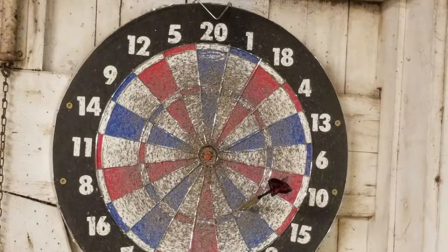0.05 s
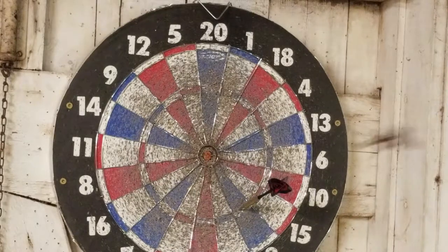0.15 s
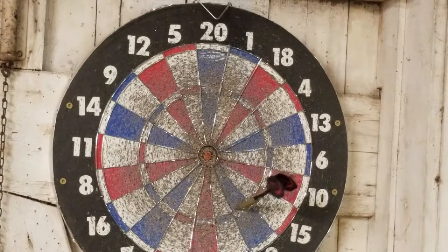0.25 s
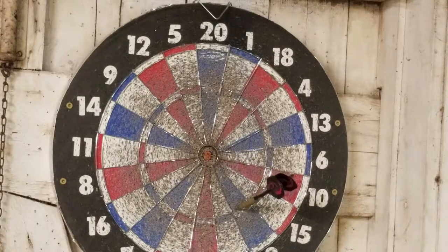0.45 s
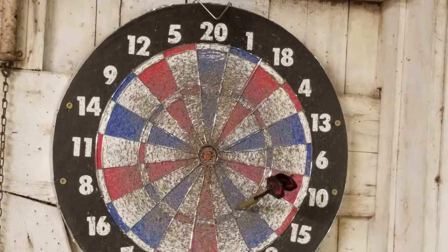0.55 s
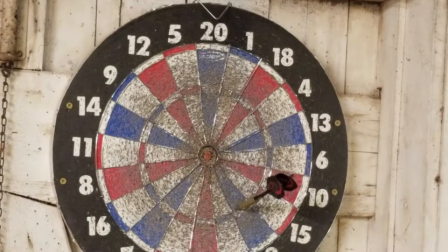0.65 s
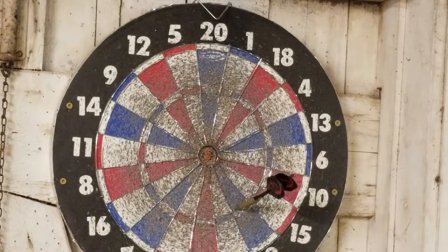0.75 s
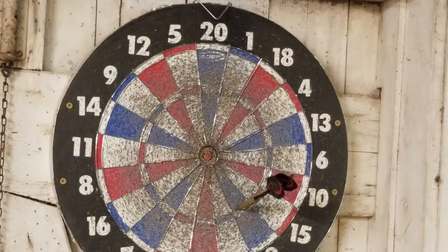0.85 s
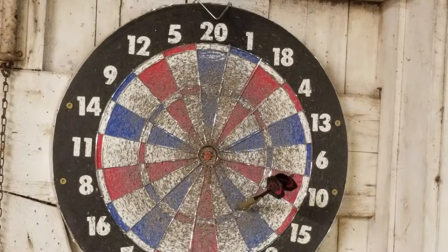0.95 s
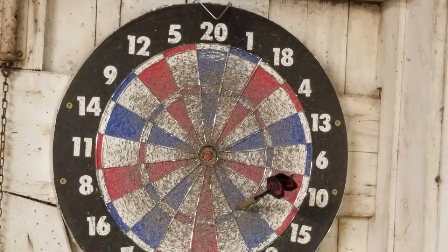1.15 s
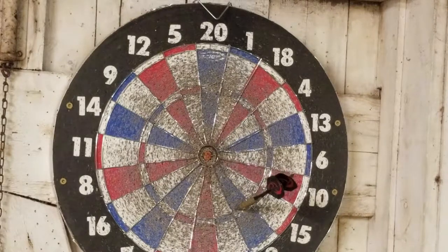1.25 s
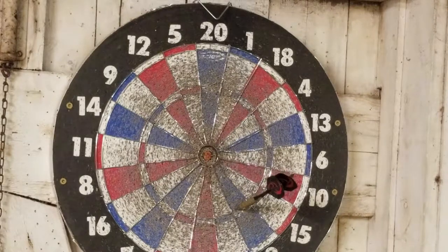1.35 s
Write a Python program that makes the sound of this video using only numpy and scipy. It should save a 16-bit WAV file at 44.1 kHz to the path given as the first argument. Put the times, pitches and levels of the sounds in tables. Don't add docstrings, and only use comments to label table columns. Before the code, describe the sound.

A dart hits a wall-hung board once at about 0.23 seconds: a very short fibrous crunch, a tiny high metallic ring, and a solid woody thump that the planks carry on. The small room's tail fades by roughly 0.6 seconds, with a faint deep shudder beneath. Throughout, a quiet low motor hum slowly throbs over rumble, thin whines and hiss; a barely audible rustle comes near 0.6.

```python
import sys
import numpy as np
from scipy import signal
from scipy.fft import rfft, irfft
from scipy.io import wavfile

SR = 44100
rng = np.random.default_rng(int(sys.argv[2]) if len(sys.argv) > 2 else 0)


def to_linear_factor(level_db):
    exponent = np.asarray(level_db, float) / 20
    return 10 ** exponent


def store_wav(level_fs):
    pcm = np.round(np.clip(np.atleast_2d(level_fs), -1, 1) * 32767)
    wavfile.write(sys.argv[1], SR, pcm.T.astype(np.int16))


N = 61739
T = np.arange(N) / SR
PAN_SPLIT_HZ = 600
LEFT_RIGHT = np.array([[1], [-1]])


def rms_one(x):
    return x / np.sqrt(np.mean(x ** 2) + 1e-20)


def at_hz(points, hz):
    point_hz, value = np.transpose(points)
    return np.interp(np.log(hz), np.log(point_hz), value)


def drift(rate_hz):
    step = 40
    r = np.exp(-2 * np.pi * rate_hz * step / SR)
    noise = rng.standard_normal(N // step + 2002)
    slow = signal.lfilter([1], [1, -2 * r, r * r], noise)[2000:]
    return np.interp(np.arange(N) / step, np.arange(len(slow)), rms_one(slow))


def ring(clicks, hz, t60):
    r = to_linear_factor(-60 / (t60 * SR))
    w = 2 * np.pi * hz / SR
    return signal.lfilter([0, np.sin(w)], [1, -2 * r * np.cos(w), r * r], clicks + 1e-18)


def struck(events, modes, spread_db):
    beam_db = 1
    s, db = np.transpose(events)
    luck = rng.standard_normal((len(s), len(modes)))
    out = np.zeros((2, N))
    for k, (hz, level_db, t60) in enumerate(modes):
        clicks = np.zeros(N)
        clicks[(s * SR).astype(int)] = to_linear_factor(db + level_db + spread_db * luck[:, k])
        pan_db = beam_db * min(hz / PAN_SPLIT_HZ, 1) * (-1) ** k
        out += ring(clicks, hz, t60) * to_linear_factor(pan_db * LEFT_RIGHT)
    return out


def bands(spectrum, alike):
    hz = np.fft.rfftfreq(N, 1 / SR)[1:]
    low_hz, high_hz = spectrum[0][0], spectrum[-1][0]
    likeness = np.clip(at_hz(alike, hz), 0, 1)
    mid, side = rfft(rng.standard_normal((2, N)))[:, 1:]
    stereo = np.sqrt(1 + likeness) * mid + np.sqrt(1 - likeness) * side * LEFT_RIGHT
    full = (hz > low_hz) * (hz < high_hz) * to_linear_factor(at_hz(spectrum, hz)) * stereo
    full = np.pad(full, ((0, 0), (1, 0)))
    full = full / np.std(irfft(full, N))
    place = 3 * np.log2(np.r_[1, hz] / 20)
    out = []
    for k in range(30):
        centre = 20 * 2 ** (k / 3)
        if low_hz / 1.3 < centre < high_hz * 1.3:
            overlap = np.clip(1 - abs(place - k), 0, 1)
            out.append((centre, irfft(full * overlap, N)))
    return out


def bandpass(x, edges_hz):
    return signal.sosfilt(signal.butter(2, edges_hz, "band", fs=SR, output="sos"), x)


def crunch():
    # frequency in Hz, density in dB per Hz.
    fibre_colour = [(410, -25.5), (700, -0.5), (1280, -3), (3100, -25), (3990, -13.5), (4990, -11.5),
                    (6500, -4.5), (8600, -20.5), (13000, -10.5), (16000, -16.5)]
    bite_s, stop_s, t60_s = 0.2215, 0.2298, 0.045
    start_db, stop_db, side_db = -35, -20.5, -7.5
    grains_per_s = 9000

    tears = rng.random((2, N)) < grains_per_s / SR
    strength = to_linear_factor(2.4 * rng.exponential(1, (2, N)))
    grains = tears * strength * rng.choice([-1, 1], (2, N))
    hz = np.fft.rfftfreq(N, 1 / SR) + 1
    mid, side = rms_one(irfft(rfft(grains) * to_linear_factor(at_hz(fibre_colour, hz)), N))
    growing = np.interp(T, [bite_s, stop_s], [start_db, stop_db])
    dying = stop_db - 60 * (T - stop_s) / t60_s
    db = np.where(T < stop_s, growing, dying)
    return (mid + to_linear_factor(side_db) * side * LEFT_RIGHT) * to_linear_factor(db) * (T > bite_s)


def barrel():
    # frequency in Hz, level in dB, t60 in seconds.
    metal_modes = [(3926, 1, 0.067), (4008, -1.5, 0.066), (3520, -15, .12), (5040, -6.5, 0.035),
                   (6660, -2, 0.017), (7400, -12, 0.032), (12670, -7, 0.046)]
    # start in seconds, level in dB.
    jolts = [
        (.2246, -30),
        (.2285, -32),
        (.2328, -28),
    ]
    return struck(jolts, metal_modes, spread_db=1.0)


def board():
    # frequency in Hz, level in dB, t60 in seconds.
    face_modes = [(1178, -2, 0.05), (870, -11, .04), (1390, -7, 0.065), (1760, -6.5, .05)]
    # start in seconds, level in dB.
    taps = [
        (.2222, -32),
        (.2248, -26.5),
        (.2265, -28.5),
    ]
    # frequency in Hz, level in dB, t60 in seconds.
    wood_modes = [(134, -13.5, .07), (154.8, 4.5, 0.14), (202.7, -8.5, 0.083), (381.5, -2, 0.068),
                  (477, -2, 0.19), (536.8, 1, 0.091), (607, 1, 0.0993), (668, -1.5, 0.15),
                  (790, -6.5, 0.058), (1353, -14, 0.18), (1525, -16, 0.11), (1717, -13.5, 0.075)]
    # start in seconds, level in dB.
    knocks = [
        (0.2237, -40.5),
        (.2322, -19.5),
        (.2375, -31),
        (0.2602, -34.5),
    ]
    # frequency in Hz, level in dB, t60 in seconds.
    plank_modes = [(151, -7.5, 0.53), (216.2, -12.5, 0.53), (260.1, -3, .3), (284.9, -0.2, .33),
                   (343.5, -9.5, 0.31), (586.4, -6, .33), (632.4, -5, .28), (730, -5, 0.23),
                   (908, -17, .28), (1008, -13, 0.25), (1260, -11, .38)]
    plank_s, plank_db = 0.243, -24.5
    contact_hz = 2520

    wood = struck(taps, face_modes, spread_db=2.5)
    wood += struck(knocks, wood_modes, spread_db=3.0)
    wood += struck([(plank_s, plank_db)], plank_modes, spread_db=1.5)
    return signal.sosfilt(signal.butter(1, contact_hz, fs=SR, output="sos"), wood)


def room_tail():
    # frequency in Hz, density in dB per Hz.
    low_colour = [(76, -20), (130, -10), (255, -6), (513, -11), (575, -9.5), (783, -8), (848, -20),
                  (1140, -16), (2000, -28), (2600, -49.5), (4400, -120)]
    high_colour = [(1180, -31.5), (2000, -5.5), (3090, -10.5), (3810, -2), (4570, -5), (6820, -3),
                   (9170, -16.5), (13000, -5.5), (16000, -17.5)]
    # frequency in Hz, t60 in seconds.
    room_t60 = [(150, 0.45), (500, .32), (1500, 0.38), (4000, .33), (8000, 0.32), (14000, 0.27)]
    # frequency in Hz, likeness from 0 to 1.
    tail_alike = [(60, 0.99), (180, 0.8), (550, 0.83), (1650, 0.1), (4970, 0.4), (15000, 0.4)]
    # colour, level in dB, start and rise in seconds
    parts = ((low_colour, -20, 0.234, 0.013), (high_colour, -24.5, 0.226, 0.0072))

    out = 0
    for colour, level_db, start_s, rise_s in parts:
        age = np.maximum(T - start_s, 0)
        build_up = 1 - np.exp(-age / rise_s)
        for hz, sound in bands(colour, tail_alike):
            out = out + sound * to_linear_factor(level_db - 60 * age / at_hz(room_t60, hz)) * build_up
    return out


def shudder():
    start_s, rise_s, t60_s, level_db = 0.3, 0.04, 1.7, -49
    age = np.maximum(T - start_s, 0)
    deep = rms_one(bandpass(rng.standard_normal(N), [32, 75]))
    return deep * to_linear_factor(level_db - 60 * age / t60_s) * (1 - np.exp(-age / rise_s))


def hum():
    # multiple of the base frequency, peak level in dB.
    motor_orders = [(1, -62), (2, -45), (4, -69), (6, -67.5), (8, -50), (10.0, -72)]
    mains_orders = [(2, -49), (4, -65)]
    motor_hz, mains_hz, in_step_s = 58.96, 60, 0.875
    out = np.zeros(N)
    for base_hz, orders in ((motor_hz, motor_orders), (mains_hz, mains_orders)):
        for order, db in orders:
            out -= to_linear_factor(db + 0.33 * drift(3)) * np.cos(2 * np.pi * order * base_hz * (T - in_step_s))
    return out


def whines():
    # frequency in Hz, width in Hz, level in dB.
    thin_whines = [(1594, 8, -89), (2890, 30, -89.5), (4820, 20, -86.5), (14300, 200, -84.5)]
    whistle_hz, whistle_db = 14282, -80
    out = to_linear_factor(whistle_db + 1.5 * drift(8)) * np.sin(2 * np.pi * whistle_hz * T)
    for hz, width, db in thin_whines:
        once = ring(rng.standard_normal(N), hz, 2.2 / width)
        out += to_linear_factor(db) * rms_one(ring(once, hz, 2.2 / width))
    return out


def background():
    # frequency in Hz, density in dB per Hz.
    rumble_colour = [(20, -28), (34, 1), (80, -11.5), (200, 0.5), (300, -6), (450, -3.5), (620, -11.5),
                     (900, -24)]
    hiss_colour = [(530, -37.5), (900, -7), (1370, -8), (1550, -3), (3730, -13.5), (4920, -5.5),
                   (8660, -15.5), (13800, -7), (16000, -6.5)]
    # frequency in Hz, likeness from 0 to 1.
    air_alike = [(60, 0.62), (180, 0.98), (550, 0.38), (1650, 0.51), (4970, 0.28), (15000, 0.18)]
    # time in seconds, level in dB.
    air_swell = [(0, 3.5), (.2, -1), (.5, 1.5), (.62, 3), (.85, 2.5), (1.1, -1), (1.4, 0)]
    rumble_db, hiss_db = -56.5, -69.5

    rumble = sum(sound * to_linear_factor(1.3 * drift(3.8)) for hz, sound in bands(rumble_colour, air_alike))
    hiss = sum(sound * to_linear_factor(1.2 * drift(3)) for hz, sound in bands(hiss_colour, air_alike))
    swell = to_linear_factor(np.interp(T, *np.transpose(air_swell)))
    return to_linear_factor(rumble_db) * rumble + swell * (to_linear_factor(hiss_db) * hiss + whines())


def rustle():
    centre_s, length_s, level_db = 0.596, 0.022, -67.5
    puff = np.exp(-((T - centre_s) / length_s) ** 2)
    return rms_one(bandpass(rng.standard_normal((2, N)), [910, 2850])) * to_linear_factor(level_db) * puff


def scene():
    low_pan_db, high_pan_db, air_pan_db = 0.2, -2.6, -0.3
    ears = LEFT_RIGHT / 2
    hit = crunch() + barrel() + board() + room_tail()
    hit = signal.sosfilt(signal.butter(3, 115, "high", fs=SR, output="sos"), hit)
    low = signal.lfilter(*signal.butter(1, PAN_SPLIT_HZ, fs=SR), hit)
    hit = low * to_linear_factor(low_pan_db * ears) + (hit - low) * to_linear_factor(high_pan_db * ears)
    return hit + shudder() + rustle() + (hum() + background()) * to_linear_factor(air_pan_db * ears)


def band_limit(x):
    return signal.sosfilt(signal.butter(12, 16790, fs=SR, output="sos"), x)


def record(dry):
    mix = signal.sosfilt(signal.cheby2(12, 50, 16200, fs=SR, output="sos"), dry)
    return band_limit(mix)


dry = scene()
out = record(dry)
store_wav(out)
```